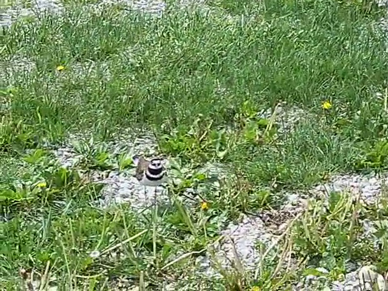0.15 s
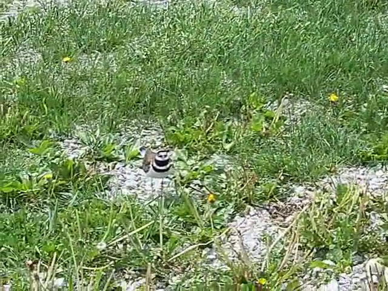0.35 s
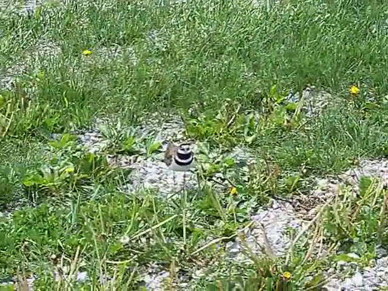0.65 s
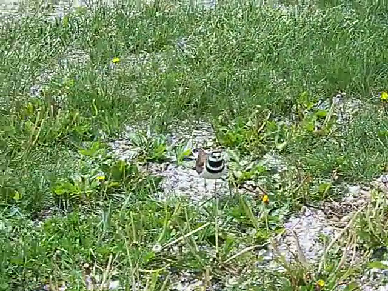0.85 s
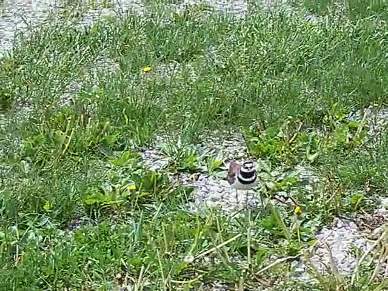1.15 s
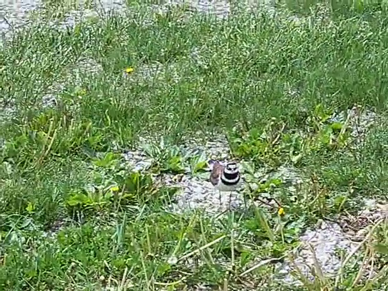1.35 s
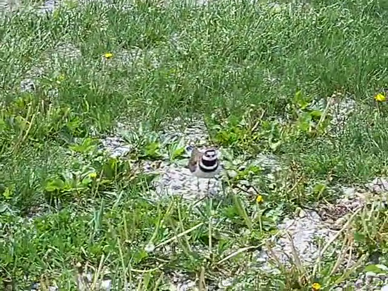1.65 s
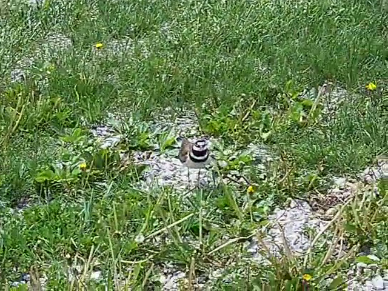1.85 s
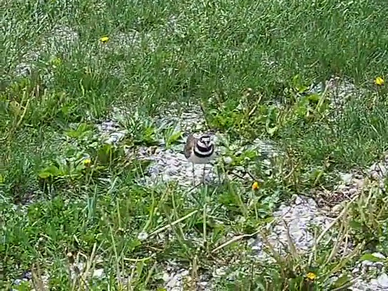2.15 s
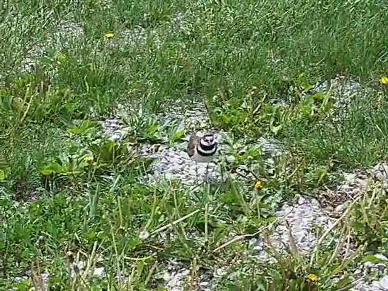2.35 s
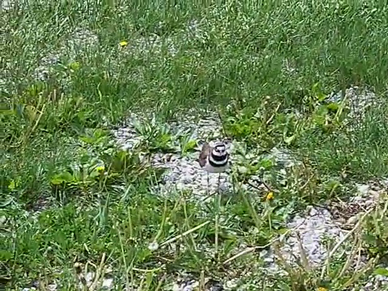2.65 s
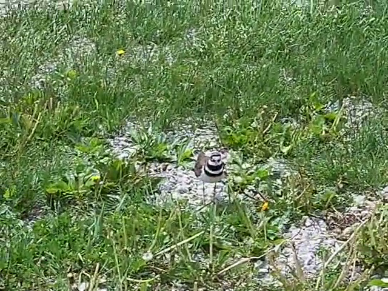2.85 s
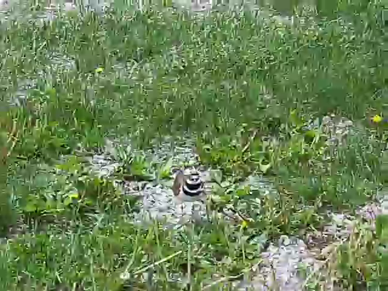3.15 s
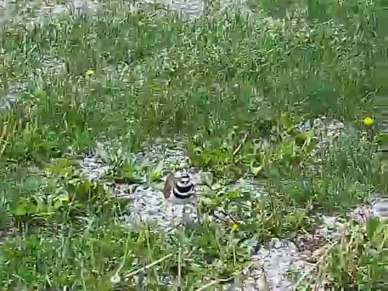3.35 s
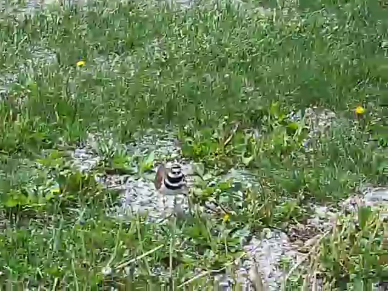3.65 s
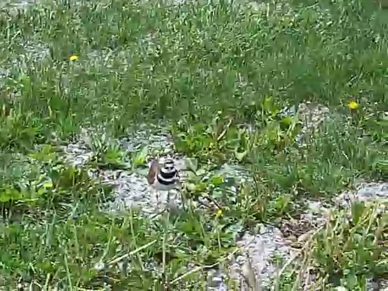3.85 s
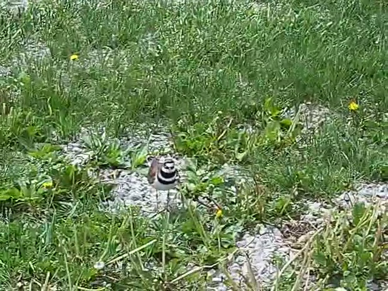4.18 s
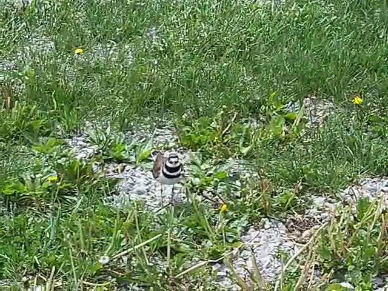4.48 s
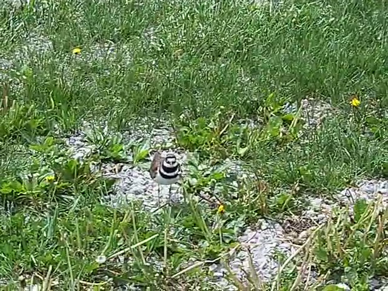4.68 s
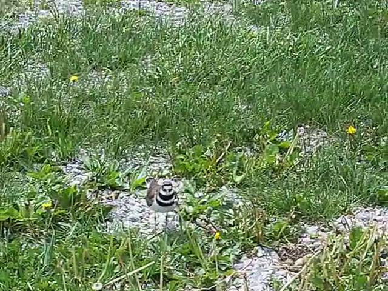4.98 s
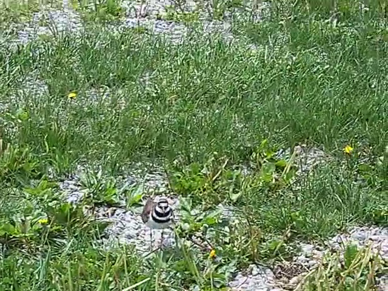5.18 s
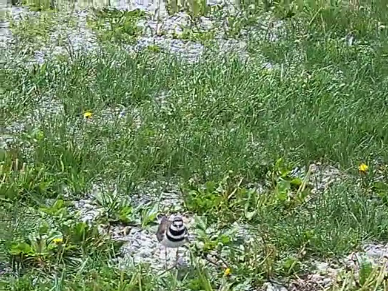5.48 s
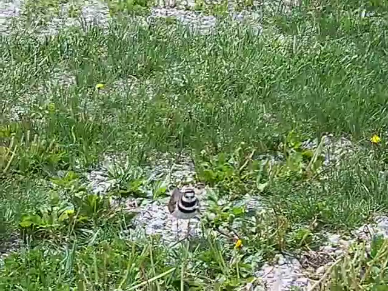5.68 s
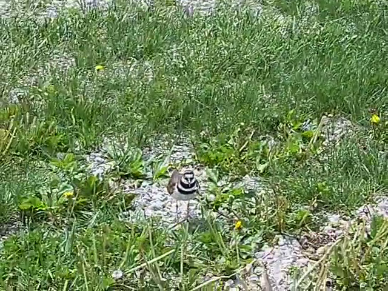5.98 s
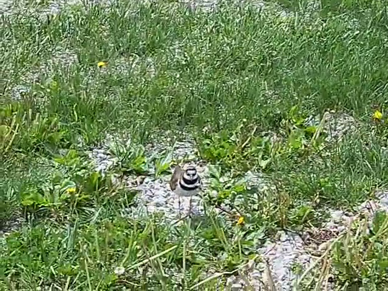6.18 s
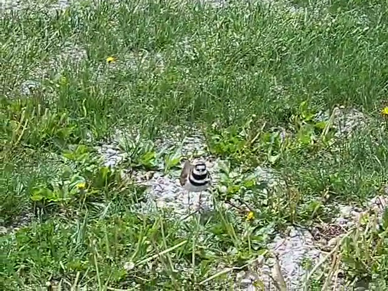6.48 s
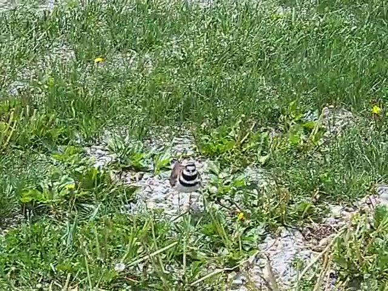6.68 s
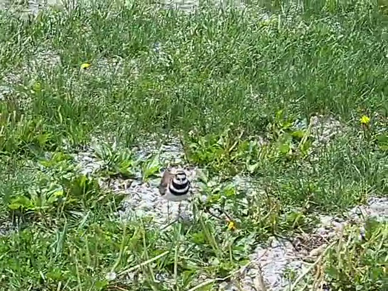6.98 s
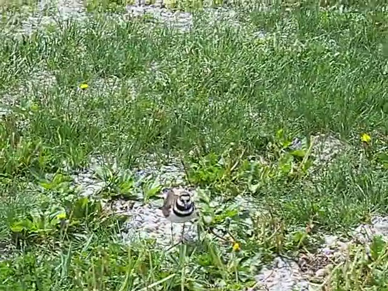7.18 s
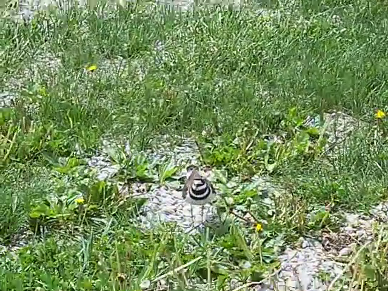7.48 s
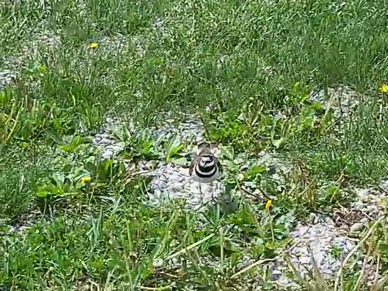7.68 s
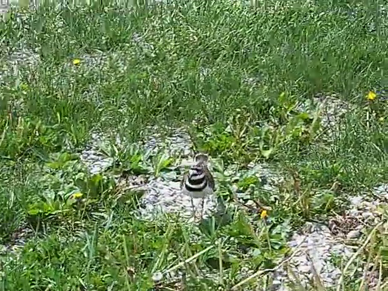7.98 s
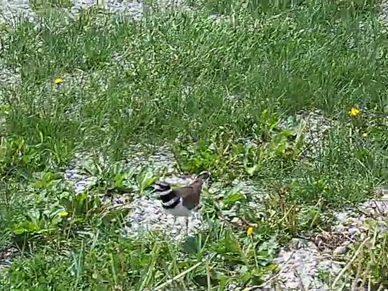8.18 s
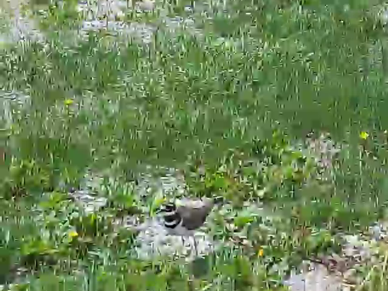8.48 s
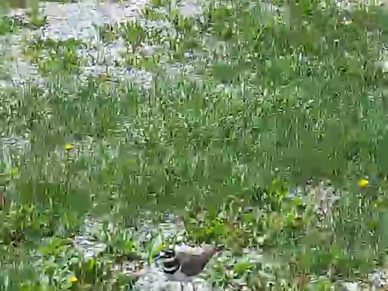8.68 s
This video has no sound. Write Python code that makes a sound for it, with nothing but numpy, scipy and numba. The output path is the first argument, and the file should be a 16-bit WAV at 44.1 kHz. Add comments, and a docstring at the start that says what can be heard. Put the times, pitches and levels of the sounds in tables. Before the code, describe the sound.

From the start, a heavy vehicle approaches outdoors with a low, throbbing drone, road roar and tyre hiss. It is loudest around 3 seconds, dropping in pitch as it passes, then slowly recedes, with a weaker engine humming behind it from about 4 to 7.5 seconds. A nearby killdeer gives four short, sharp alarm whistles at about 2.1, 5.2, 6.0 and 7.2 seconds. Each starts high and slightly raspy, dips, then flicks upward. A plastic button clicks right at the microphone, pressed and released at 1.7 and 1.9 seconds, and again at 4.1 and 4.5. Wind buffets the microphone on and off, with the strongest low puffs between 6 and 6.5 seconds. Small birds chirp faintly far away, once near 2.6 seconds and more often after 6. A tiny handling tick comes near 7.4 seconds, and grass rustles softly near the end.

```python
"""A killdeer on gravel gives four alarm whistles, each a gliding harmonic tone, near a small camera.
A heavy vehicle drones past and away, its firing tone Doppler-shifted down, a weaker engine behind it.
Small birds chirp far off, wind buffets the microphone and stirs the grass, and a finger clicks
a button twice, ringing the camera's case. The camera ducks its gain after loud peaks and samples
slowly, so that sound near its band limit is mirrored (aliasing)."""
import sys
import numpy as np
from scipy import signal
from scipy.fft import rfft, irfft, next_fast_len
from scipy.io import wavfile
from scipy.ndimage import uniform_filter1d, map_coordinates
from numba import njit

SR = 44100
rng = np.random.default_rng(int(sys.argv[2]) if len(sys.argv) > 2 else 0)


def generate_wav(sig):
    """Save sig (samples, or channels by samples) to the path in sys.argv[1] as 16-bit PCM at SR."""
    pcm = np.round(np.clip(np.atleast_2d(sig).T, -1, 1) * 32767).astype(np.int16)
    wavfile.write(sys.argv[1], SR, pcm)


N = 389844


def amp(db):
    """Amplitude ratio of a level in decibels."""
    return 10 ** (np.asarray(db) / 20)


def unit(x):
    """Normalisation to rms 1."""
    return x / np.sqrt(np.mean(x ** 2) + 1e-20)


def along(points, hz):
    """Interpolation of (frequency [Hz], value) points on a logarithmic frequency axis."""
    f, v = np.transpose(points)
    return np.interp(np.log(hz + 1), np.log(f + 1), v)


def curves(rows):
    """Linear interpolation in time: one value per sample for each column after the first."""
    times, *columns = np.transpose(rows)
    return [np.interp(np.arange(N) / SR, times, column) for column in columns]


def wobble(rate):
    """Smooth random modulation: a spline through rate Gaussian knots a second."""
    return map_coordinates(rng.standard_normal(int(N * rate / SR) + 4), [np.arange(N) * rate / SR])


def filtered(x, response):
    """Linear filtering: the spectrum of x times a frequency response."""
    size = next_fast_len(N + SR // 2)
    return irfft(rfft(x, size) * response(np.fft.rfftfreq(size, 1 / SR)), size)[..., :N]


def rush(spectrum, patchy_db):
    """Spectrally shaped noise of rms 1, its gain varying in random time-frequency patches."""
    cells = signal.stft(rng.standard_normal(N), nperseg=512)[2]
    patches = uniform_filter1d(rng.standard_normal(cells.shape), size=5, axis=0)
    patches = uniform_filter1d(patches, size=14, axis=1)
    noise = signal.istft(cells * amp(patchy_db * unit(patches)), nperseg=512)[1][:N]
    return unit(filtered(noise, lambda hz: amp(along(spectrum, hz))))


def tone(hz, db):
    """A sine of rms level db whose phase is the integral of its frequency."""
    return np.sqrt(2) * amp(db) * np.sin(2 * np.pi * np.cumsum(hz) / SR)


def far_birds():
    """Frequency modulation: thin chirps, each gliding along a parabola through three pitches."""
    # (time [s], duration [s], start pitch [Hz], middle pitch [Hz], end pitch [Hz], level [dB])
    chirps = [(2.595, 0.18, 6591, 7140, 7150, -52), (6.184, 0.033, 7200, 6060, 4800, -61),
              (6.332, 0.028, 6720, 6454, 6100, -62), (6.374, 0.039, 7330, 6600, 4800, -59),
              (6.518, 0.046, 7030, 6360, 5950, -61), (6.557, 0.042, 6250, 5930, 5650, -59),
              (6.568, 0.039, 7450, 6800, 4900, -62), (6.75, 0.072, 4480, 4500, 4480, -57),
              (6.771, .04, 4500, 5400, 5100, -60), (6.898, .045, 4780, 5284, 5350, -60),
              (7.005, .02, 5600, 5350, 4970, -64), (7.925, 0.042, 4300, 4347, 4330, -62),
              (8.032, 0.024, 3863, 3754, 3483, -67), (8.44, 0.021, 6340, 6250, 6200, -63),
              (8.688, 0.023, 3900, 3700, 3350, -67), (8.812, 0.022, 3790, 3600, 3342, -67)]
    out = np.zeros(N + SR)
    for s, length, start, middle, end, db in chirps:
        progress = np.linspace(0, 1, round(length * SR))
        hz = np.polyval(np.polyfit([0, .5, 1], [start, middle, end], 2), progress)
        out[round(s * SR):][:len(hz)] += tone(hz, db) * np.sin(np.pi * progress) ** .5
    return out[:N] * amp(2.5 * wobble(120))  # moving air and leaves blur them


def wind():
    """Turbulence: low pressure fluctuations and single puffs at the microphone; grass rustles."""
    # envelopes: (time [s], level [dB])
    gusts = [(0, -48), (.5, -31.5), (1, -45.5), (2, -34.5), (3, -42), (3.3, -35), (4, -42), (5.7, -44),
             (5.95, -29.5), (6.15, -32.5), (6.4, -31.5), (6.6, -40.5), (7.3, -35), (8, -47), (8.84, -50)]
    breeze = [(0, -70.5), (5, -72), (7.5, -72.5), (7.85, -64), (8.3, -65), (8.84, -69)]
    # spectra: (frequency [Hz], relative density [dB])
    buffet = [(8, -28.5), (20, -2), (38, -8), (55, -6.5), (120, -21.5), (250, -36.5), (400, -82.5)]
    rustle = [(3000, -61.5), (4300, -6), (5250, 0), (6000, -5), (7900, -15.5), (9500, -62)]
    # pressure pulses: (time [s], gain [dB], characteristic frequency [Hz])
    puffs = [(3.24, -25, 50), (5.95, -21, 110), (6.325, -27, 45), (6.383, -21, 120)]
    out = amp(curves(gusts)[0]) * unit(amp(wobble(14)) * rush(buffet, patchy_db=-3.0))
    for s, db, hz in puffs:
        u = np.arange(SR // 10) / SR * hz * 2 * np.pi
        push_and_rebound = 2 * u ** 2 * (1 - u / 3) * np.exp(-u)
        out[round(s * SR):][:len(u)] += amp(db) * push_and_rebound
    return out + amp(curves(breeze)[0]) * rush(rustle, patchy_db=1)


def handling():
    """Impacts excite damped modes, bright on the press and dull on release; faint ticks are noise."""
    # button presses and releases in turn: (time [s], gain [dB])
    clicks = [(1.6858, -17), (1.9017, -15), (4.0963, -16.5), (4.5435, -18)]
    # plastic case and spring: (frequency [Hz], press gain [dB], release gain [dB], 60 dB decay [s])
    modes = [(387, -18, -15.5, 0.085), (910, -16.5, -10.5, 0.041), (1420, -4, -2.5, 0.018),
             (2035, -5.5, -2, 0.018), (2825, -11, -4.5, 0.025), (4500, -4, 0, 0.0037),
             (5470, -2, -8, 0.0069), (5940, -8, -16.5, 0.017), (6840, -9.5, -21.5, 0.013),
             (7800, -0.5, -22, 0.017)]
    # handling ticks: (time [s], relative level [dB], 60 dB decay [ms])
    ticks = [(7.3525, -29, 6), (8.179, -42, 5), (8.3, -42, 20), (8.3528, -44, 7), (8.553, -40, 5)]
    out, t = np.zeros(N + SR), np.arange(SR // 20) / SR
    hz, press_db, release_db, t60 = np.transpose(modes)[:, :, None]
    polarity = (-1) ** np.arange(len(modes))
    for k, (s, db) in enumerate(clicks):
        level_db = (release_db if k % 2 else press_db) + rng.normal(0, 0.55, hz.shape)
        ring = polarity @ (amp(level_db - 60 * t / t60) * np.sin(2 * np.pi * hz * t))
        click = amp(db) * (ring + 0.17 * amp(-60 * t / 0.036) * rng.standard_normal(len(t)))
        dull_bounce = amp(-16) * uniform_filter1d(click, size=7)
        out[round(s * SR):][:len(t)] += click
        out[round((s + .0041) * SR):][:len(t)] += dull_bounce
    for s, db, ms in ticks:
        bright_noise = np.diff(rng.standard_normal(len(t) + 1))
        out[round(s * SR):][:len(t)] += amp(db - 9.0 - 60 * t / (ms / 1000)) * bright_noise
    return out[:N]


def weaker_engine():
    """Periodic firing: a single faint tone that rises slowly in pitch."""
    # (time [s], frequency [Hz], level [dB])
    firing = [(3.2, 73, -60), (4, 73.8, -43), (5.3, 75.3, -41), (6.15, 77, -39), (6.6, 78, -47),
              (7.4, 79.5, -48), (7.9, 80.5, -60)]
    hz, db = curves(firing)
    return tone(hz + 0.26 * wobble(4), db + 1.5 * wobble(5.5))


def heavy_engine():
    """Doppler shift: the firing tone and its engine orders sink in pitch as the vehicle passes."""
    # firing tone as heard: (time [s], frequency [Hz], level [dB])
    firing = [(0, 75.8, -33), (.15, 75.1, -40), (.4, 75.08, -46), (.62, 74.4, -42), (.75, 74.27, -34),
              (1.25, 73.1, -35.5), (1.5, 71.36, -29), (2.14, 70.2, -26.5), (2.55, 68.8, -23),
              (3.0, 66.7, -21), (3.3, 65.3, -22), (3.9, 64.5, -24), (4.6, 64.32, -25), (5.83, 64.47, -30),
              (6.13, 64.1, -29.5), (7.1, 63.85, -30.5), (7.7, 63.7, -34.5), (8.2, 64.1, -37.5),
              (8.84, 64.65, -37)]
    # weaker orders: (time [s], levels at 1.5, 2, 3 and 4 times the firing frequency [dB])
    orders = [(0, -47, -70, -52, -73), (1.5, -55, -60.5, -47.5, -66), (2.2, -69, -43.5, -48.5, -52.5),
              (3, -49, -52.5, -50.5, -69), (3.4, -54, -45, -64, -82.5), (4.5, -54.5, -51.5, -60.5, -73),
              (6, -52.5, -46.5, -70, -60.5), (7.5, -66, -51, -72, -66), (8.84, -76, -52.5, -67, -62)]
    throb_hz, throb_db, trough_s, throb_end_s = 3.1, -38, .93, 2.4
    t = np.arange(N) / SR
    hz, firing_db = curves(firing)
    hz = uniform_filter1d(hz, size=SR // 3) + .25 * wobble(6)  # the pitch glides smoothly down
    depth = np.clip(amp(throb_db - firing_db), 0, .9) / (1 + np.exp((t - throb_end_s) / 0.18))
    throb = 1 - depth * np.cos(2 * np.pi * throb_hz * (t - trough_s))  # heard on the approach
    drone = tone(hz, firing_db + 0.44 * wobble(12)) * throb
    return drone + sum(tone(k * hz, db + 1.7 * wobble(8)) for k, db in zip((1.5, 2, 3, 4), curves(orders)))


def road_noise():
    """Rolling noise: rumble, roar and tyre hiss, each an equal-power mix of near and far spectra."""
    # (time [s], relative rumble level [dB], roar level [dB], hiss level [dB])
    levels = [(0.0, -44.5, -37.5, -43), (0.22, -43.5, -36.5, -41.5), (0.6, -45, -41, -47.5),
              (1.5, -44, -39.5, -51.5), (1.87, -43, -36, -47), (2.2, -43.5, -36, -45), (2.5, -45, -36, -46),
              (2.95, -46.5, -38.5, -48), (3.8, -47.5, -38.5, -54), (4.1, -49, -40, -60.5),
              (4.7, -48.5, -39, -61.5), (5.4, -52.5, -41.5, -65.5), (5.9, -52.5, -41.5, -67.5),
              (6.85, -55.5, -42.5, -64), (7.15, -54.5, -42, -64), (7.7, -51.5, -41.5, -70.5),
              (8.1, -49, -43.5, -72), (8.84, -45.5, -44, -71.5)]
    # (time [s], power share of the near spectra [0-1])
    nearness = [(0, 1), (2, 0.9), (3.5, 0.75), (4.5, 0), (6, 0.04), (8.84, 0.02)]
    # spectra: (frequency [Hz], relative density [dB])
    rumble_near = [(30, -48), (50, -1), (100, -3.5), (140, -2), (220, -0.5), (300, -5), (450, -10),
                   (600, -16.5), (800, -65.5)]
    rumble_far = [(30, -29), (50, 5.5), (100, -3), (140, -7.5), (190, -7), (300, -11), (450, -15),
                  (600, -16), (800, -56)]
    roar_near = [(260, -33.5), (450, -8), (489, -18.5), (592, -11.5), (772, -3), (910, -0.5), (1200, -2.5),
                 (1360, -4.5), (1520, -6.5), (1710, -4), (2680, -6), (3520, -21), (4000, -34.5),
                 (5200, -66), (8800, -120)]
    roar_far = [(260, -43), (450, -19), (640, -11.5), (830, -11), (900, -5.5), (1200, -6), (1450, -2),
                (1750, -5), (2200, -8.5), (2600, -10), (2950, -15), (3300, -27.5), (3700, -41.5),
                (4300, -46.5), (6000, -120)]
    hiss_near = [(2350, -54), (4000, -17.5), (4250, -26.5), (4800, -25), (5200, -11), (6010, -4),
                 (6990, -2.5), (7900, -10), (10300, -48.5), (17400, -120)]
    hiss_far = [(2180, -36.5), (3700, -1.5), (4760, 1), (5430, -3.5), (6490, -2), (7660, -4.5), (7800, -3),
                (10100, -35.5), (17200, -120)]
    rumble_db, roar_db, hiss_db = curves(levels)
    share = curves(nearness)[0]

    def blend(near, far, patchy_db):
        return np.sqrt(share) * rush(near, patchy_db) + np.sqrt(1 - share) * rush(far, patchy_db)

    roar = amp(roar_db + 0.36 * wobble(8)) * blend(roar_near, roar_far, patchy_db=1.0)
    hiss = amp(hiss_db + 0.22 * wobble(10)) * blend(hiss_near, hiss_far, patchy_db=2.0)
    rumble = amp(rumble_db + 4.0 + 0.15 * wobble(9.4)) * blend(rumble_near, rumble_far, patchy_db=0.54)
    return rumble + roar + hiss


def roar_swish():
    """A wavering band near 1 kHz in the passing vehicle's road roar: noise sidebands round a carrier."""
    # (time [s], centre frequency [Hz], level [dB])
    band = [(0.0, 1040, -39), (0.2, 1030, -53), (0.68, 947, -45.5), (1.41, 983, -44.5), (1.879, 1135, -40),
            (2.3, 1006, -56), (3.51, 990, -42.5), (4.19, 1170, -48.5), (4.6, 1182, -51)]
    faded = (5.2, band[-1][1], -68)
    centre_hz, db = curves(band + [faded])
    return tone(centre_hz, db) * rush([(5, -5.5), (90, -4), (250, -12.5), (600, -86)], patchy_db=0.5)


def reflections(voice):
    """Multipath propagation: discrete echoes from fences and walls, scatter from weeds and stones."""
    # (delay [s], gain [dB], added gain above 5500 Hz [dB])
    paths = [(.016, -31, 0), (.05, -38, 0), (.066, -39, 0), (.158, -37, -12)]
    t = np.arange(SR // 3) / SR
    scatter = rng.standard_normal(len(t)) * amp(-60 * t / .35)
    out = amp(-33.5) * signal.fftconvolve(voice, scatter / np.linalg.norm(scatter))[:N]
    for delay, db, treble_db in paths:
        delayed = np.pad(voice, (round(delay * SR), 0))[:N]
        out += filtered(delayed, lambda hz: amp(db + treble_db * (hz > 5500)))
    return out


def call_contour(start, top_hz, top_db, low_at, climb_at, low_hz, low_db,
                 flat_at, flat_hz, flat_db, flick_at, flick_hz, flick_db):
    """Modulation of one call as (time [s], pitch [Hz], level [dB]): top, drop, climb, plateau, flick."""
    # offsets from the opening top and from the final flick: (time [s], pitch [Hz], level [dB])
    onset = [(-.004, -110, -39), (0, -65.5, -4.5), (.005, -11, 1.5), (0.012, 2, 0)]
    ending = [(0, 0.5, -2), (.004, -1.5, -4), (0.012, -39.5, -33.5)]
    drop_at, plunge_s, drop_share, sag_share, fade_exponent = .0205, .0085, .82, .26, .7
    flick_s, flick_db_per_hz = .0152, .043  # the higher the flick jumps, the more its level rises
    opening = [(s, top_hz + hz, top_db + db) for s, hz, db in onset]
    since = np.linspace(0, low_at - drop_at, 12)
    plunge = np.exp(-since / plunge_s) - np.exp(-since[-1] / plunge_s)
    height = (1 - sag_share) * plunge + sag_share * (1 - since / since[-1])
    drop_hz = low_hz + (top_hz - low_hz) * drop_share * height
    drop_db = low_db + (top_db - low_db) * height ** fade_exponent
    drop = list(zip(drop_at + since, drop_hz, drop_db))
    flat_end = flick_at - flick_s
    body = [(max(climb_at, low_at), low_hz, low_db), (min(flat_at, flat_end), flat_hz, flat_db),
            (flat_end, flat_hz, flick_db - flick_db_per_hz * (flick_hz - flat_hz))]
    closing = [(flick_at + s, flick_hz + hz, flick_db + db) for s, hz, db in ending]
    points = [(start + s, hz, db) for s, hz, db in opening + drop + body + closing]
    first, last = points[0], points[-1]
    return [(first[0] - .0028, first[1], -120), *points, (last[0] + .0073, last[1], -120)]  # silent ends


def killdeer():
    """Oscillation of the syrinx: a whistle of four harmonics, each weighted by the path's response."""
    # (start [s], top pitch [Hz], top level [dB], drop end [s], climb start [s], low pitch [Hz],
    #  low level [dB], plateau start [s], plateau pitch [Hz], plateau level [dB], flick time [s],
    #  flick pitch [Hz], flick level [dB]); times count from the start, levels are before the path
    calls = [(2.064, 2421, -30.5, .052, .099, 2035, -50, .187, 2163, -39, .242, 2271, -32),
             (5.185, 2427, -30.5, .058, .062, 2028, -56, .127, 2136, -43, .192, 2271, -33),
             (6.043, 2322, -35, .078, .084, 2034, -48, .096, 2049, -47, .112, 2185, -39),
             (7.249, 2433, -32, .046, .054, 2112, -43, .114, 2260, -36, .17, 2286, -33)]
    # response from bird to microphone: (frequency [Hz], gain [dB])
    path = [(2000, 8.5), (2250, -5), (2450, -3.5), (4000, 7.5), (4100, 12), (4200, 4.5), (4300, 7.5),
            (4400, 1), (4540, 5), (4900, 6), (6000, 1), (6500, 1.5), (7400, 2), (8100, -2.5), (8700, -21),
            (9000, -51), (9800, -57)]
    pitch, effort_db = curves([point for call in calls for point in call_contour(*call)])
    pitch = uniform_filter1d(pitch, size=180)  # the syrinx glides round corners
    voice = sum(tone(k * pitch, effort_db + along(path, k * pitch)) for k in range(1, 5))
    rasp = rush([(3000, -34), (4800, 3.0), (6800, 2.0), (8000, -30)], patchy_db=3.0)
    voice += amp(effort_db - 17) * np.clip((pitch - 2290) / 120, 0, 1) * rasp  # only at high pitch
    snaps = amp(-60 * np.arange(600) / SR / 0.013) * np.diff(rng.standard_normal((len(calls), 601)))
    for (start, _, top_db, *_), snap in zip(calls, snaps):
        voice[round((start - .002) * SR):][:600] += amp(top_db - 12.5) * snap  # the voice breaks in
    return voice


def scene():
    """Superposition of all sources at a single microphone."""
    voice = killdeer()
    birds = voice + reflections(voice) + far_birds()
    traffic = heavy_engine() + weaker_engine() + road_noise() + roar_swish()
    return (birds + traffic + wind() + handling())[None]


@njit
def held(excess, release):
    """Peak detection: instant attack, exponential release."""
    out = excess.copy()
    for i in range(1, len(out)):
        out[i] = max(out[i], out[i - 1] * release)
    return out


def record(dry):
    """The camera: port antiresonance, gain compression, electronic noise, aliasing, low-pass filter."""
    # low-pass response: (frequency [Hz], gain [dB])
    roll_off = [(7700, 0), (8050, -4.5), (8350, -10.5), (8700, -22.5), (9000, -35), (9250, -59)]
    notch_hz, inner_width_hz, outer_width_hz = 4203, 30, 600
    threshold_db, duck_slope, release_s = -16, .7, .12
    hiss_db, whine_hz, whine_db = -66, 7989.5, -67.5
    sampling_hz, cutoff_hz = 16000, 9265
    quadratic = lambda hz, width: notch_hz ** 2 - hz ** 2 + 1j * hz * width
    x = filtered(dry[0], lambda hz: quadratic(hz, inner_width_hz) / quadratic(hz, outer_width_hz))
    over_db = np.maximum(20 * np.log10(np.abs(x) + 1e-9) - threshold_db, 0)
    held_db = uniform_filter1d(held(over_db, np.exp(-1 / (release_s * SR))), size=88, origin=43)
    x = x * amp(-duck_slope * held_db) + amp(hiss_db) * rng.standard_normal(N)
    x += tone(np.full(N, whine_hz), whine_db + 2.3 * wobble(7))
    treble = filtered(x, lambda hz: (hz > 5000) * (hz < 11000))
    images = treble * 2 * np.cos(2 * np.pi * sampling_hz * np.arange(N) / SR)  # f maps to sampling_hz - f
    return filtered(x + images, lambda hz: amp(along(roll_off, hz)) * (hz < cutoff_hz))[None]


dry = scene()
out = record(dry)
generate_wav(out)
```